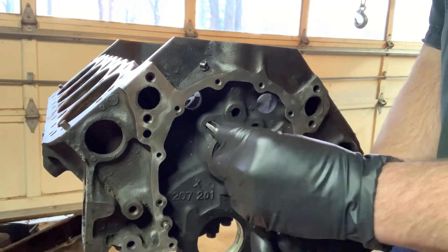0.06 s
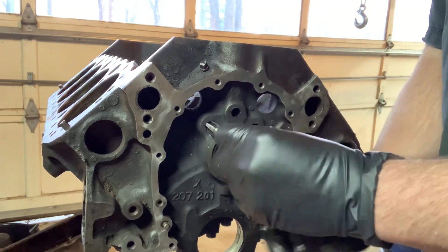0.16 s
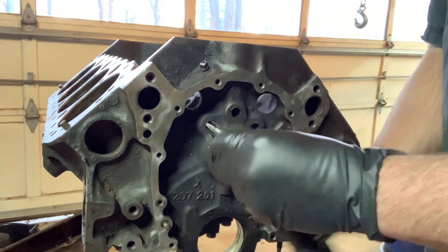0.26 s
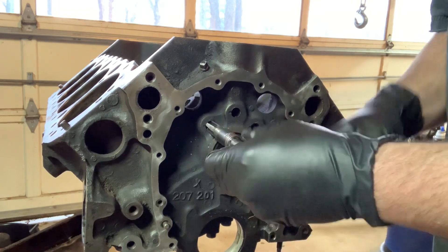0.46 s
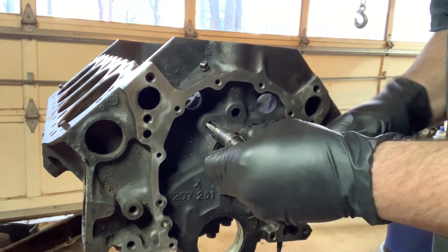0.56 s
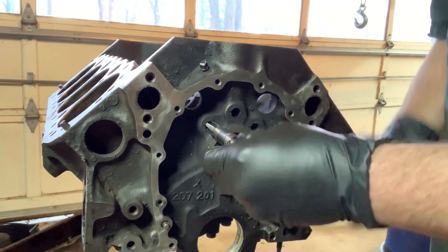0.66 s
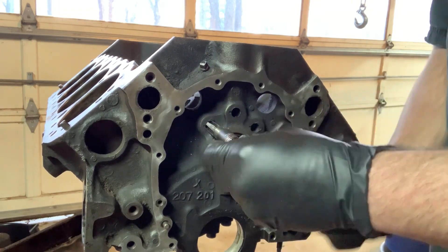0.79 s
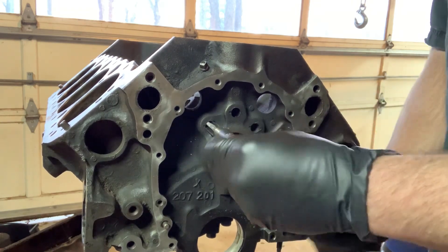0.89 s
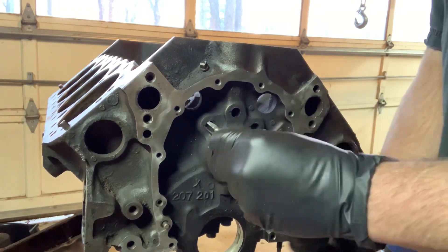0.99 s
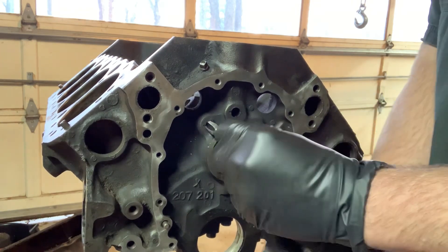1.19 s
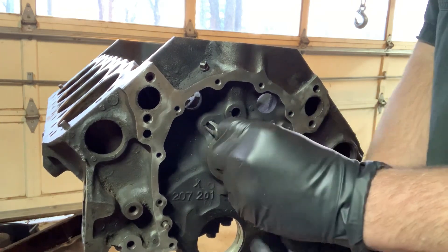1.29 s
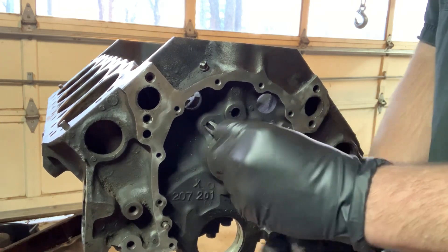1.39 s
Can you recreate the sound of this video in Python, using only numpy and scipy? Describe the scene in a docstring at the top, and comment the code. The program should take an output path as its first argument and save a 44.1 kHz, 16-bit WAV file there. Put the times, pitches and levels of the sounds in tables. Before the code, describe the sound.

A ratchet wrench clicks backward on a tap in an iron block. Faint glove rub and a tick open; from 0.23 to 0.5 s some sixteen bright, thin, ringing clicks run unevenly, strongest early, over fine steel sliding. Then quiet rustles and small ticks, soft knocks near 0.76 and 0.95, a fuller dull thud with rattle at 1.32, and a last tick at 1.42. Close, right-leaning, roomy, low rumble and hiss.

```python
"""A large workshop: a ratcheting handle is swung back on a pipe tap seated in a cast-iron engine block.
The pawl skips over a row of teeth: each drop rings the wrench's modes, a short clack and a noisy crack.
Sliding grains join the skips; damped thuds with a rattle, small ticks and glove rubbing come from handling.
Delay loops give the room's answer above a bed of rumble, hiss and hum made from shaped noise.
Two close microphones hear the tool slightly to one side: nearly all of it reaches the right one first."""
import sys
import numpy as np
from scipy import signal
from scipy.fft import rfft, irfft, next_fast_len
from scipy.io import wavfile

SR = 44100
rng = np.random.default_rng(int(sys.argv[2]) if len(sys.argv) > 2 else 0)


def level_to_linear(level):
    """Convert decibel levels to linear amplitude factors, elementwise."""
    exponent = np.asarray(level, float) / 20
    return 10 ** exponent


def unload_wav(signal):
    """Save mono or channel-first audio to the path in sys.argv[1] as 16-bit WAV at rate SR, clipped to [-1, 1]."""
    wavfile.write(
        sys.argv[1],
        SR,
        np.round(np.clip(np.atleast_2d(signal).T, -1, 1) * 32767).astype(np.int16),
    )


N = 63945  # length [samples]
NOW_S = np.arange(N) / SR
BIN_HZ = np.maximum(np.fft.rfftfreq(N, 1 / SR), 1)

# Pawl dropping behind each tooth, before mode levels and trims: (time [s], high ring [dB],
# low ring over high [dB], clack over high [dB], clack pitch [Hz])
TOOTH_DROPS = [(0.2294, -25.5, -7, -12.5, 2930), (0.2526, -24, -4.5, -12, 1640),
               (0.2732, -20, -12.5, -14, 1790), (0.2904, -19, -17.5, -13.5, 1607),
               (0.3052, -27.5, -5, -41.5, 2980), (0.3199, -25, -9.5, -12, 3116),
               (0.3355, -39, -17.5, 3.5, 3580), (0.3551, -22.5, -30.5, -10, 2700),
               (0.3747, -22, -9.5, -13, 2058), (0.3931, -28.5, -14, -8.5, 2680),
               (0.4039, -32.5, -6, -25, 3340), (0.4121, -22.5, -25, -16.5, 1960),
               (0.4297, -29.5, -5, 1, 2600), (0.4441, -43, -23, 4.5, 3710), (0.4578, -29, -3.5, -4.5, 1690),
               (0.4973, -30.5, -4.5, 1, 2187)]
# Vibration modes of the wrench, each part sounding from its own spot:
# (frequency [Hz], decay by 60 dB [s], lag of the left microphone [s])
WRENCH_MODES = [(4565, .05, 175e-6), (4608, .075, 165e-6), (9360, .02, 67e-6), (9466, .07, 67e-6),
                (9503, .06, 67e-6), (10300, .006, 60e-6), (10700, .007, 60e-6), (8500, .006, 67e-6),
                (11400, .006, 60e-6), (15300, .035, 45e-6), (15410, .03, 45e-6)]
# Strength of each of those modes, in the same order: (level over the ring [dB])
MODE_STRENGTHS = [-12, -5.5, -15.5, -7, -9.5, -18, -14, -31.5, -10.5, -19.5, -21]
# Relative spectrum of the broadband crack: (frequency [Hz], density [dB per Hz])
CRACK_SPECTRUM = [(530, -57.5), (900, -19.5), (4020, -14), (4650, -16), (6310, -12), (9540, -24),
                  (11900, -11.5), (15700, -25.5), (16500, -36.5)]
# Swell and fade of the pawl dragging up the teeth: (time [s], level [dB])
DRAG_SWELL = [(0.169, -92), (0.191, -66.5), (0.227, -57.5), (.3, -49.5), (.42, -51), (.48, -64),
              (0.521, -88.5), (0.559, -93)]
# Relative spectrum of the drag: (frequency [Hz], density [dB per Hz])
DRAG_SPECTRUM = [(150, -2.5), (300, -8), (900, -5.5), (2000, 4), (4000, 5), (7000, 4), (12000, -57),
                 (16500, -48)]
# Dull knocks of tool and hand: (time [s], thud level [dB], thud pitch [Hz], rattle over thud [dB])
DULL_KNOCKS = [(0.183, -53.5, 1023, 4), (0.415, -47.5, 1028, 3), (0.761, -62, 1010, 7),
               (0.95, -57.5, 1095, 3.5), (1.324, -40, 1196, -4)]
# Relative spectrum of the knocks' rattle: (frequency [Hz], density [dB per Hz])
RATTLE_SPECTRUM = [(71, -17.5), (120, -9), (537, -15), (1150, -7), (1560, -10), (3210, -19), (6500, -54),
                   (8080, -56), (9000, -65), (11700, -89), (19800, -120)]
# Dying away of the rattle by pitch: (frequency [Hz], decay by 60 dB [s])
RATTLE_DECAY = [(150, 0.22), (600, 0.28), (1500, 0.16), (4000, 0.16), (9000, 0.15)]
# Small ticks: (time [s], level before trim [dB], centre [Hz], width [octaves])
SMALL_TICKS = [(0.0302, -61, 2200, 0.9), (0.1382, -69.5, 1730, 0.65), (0.6002, -60.5, 4770, 1.0),
               (0.6752, -63, 4400, 0.63), (0.6907, -58.5, 1680, 0.48), (0.8535, -71.5, 1400, 0.93),
               (1.1122, -76, 1330, 0.66), (1.2472, -56.5, 4140, 1.0), (1.4234, -50, 2200, 0.89)]
# Glove rubbing on the tool, before trims: (time [s], dull rub [dB], bright rustle [dB], low rumble [dB])
GLOVE_RUB = [(0.0, -92, -76.5, -95), (0.02, -71.5, -68.5, -91), (0.05, -67.5, -71.5, -68),
             (0.124, -105, -101, -79), (0.17, -73, -94, -103), (0.62, -81, -70.5, -112),
             (0.636, -69, -89.5, -108), (0.7, -84, -71, -70.5), (0.726, -101, -100, -110),
             (0.766, -71, -67, -72.5), (0.81, -79, -77.5, -64.5), (0.844, -76.5, -101, -89.5),
             (0.854, -65, -78, -72), (0.914, -96, -100, -94), (0.964, -70, -71.5, -61),
             (1.022, -63, -92, -71.5), (1.146, -105, -87.5, -90.5), (1.246, -80.5, -73.5, -100.5),
             (1.27, -93.5, -85.5, -89), (1.298, -90, -101, -94.5), (1.326, -60.5, -65, -67),
             (1.408, -69.5, -70, -69), (1.45, -70.5, -65, -74.5)]
# Relative spectrum of the bright rustle: (frequency [Hz], density [dB per Hz])
RUSTLE_SPECTRUM = [(700, -27.5), (1500, 12.5), (3000, 7.5), (5500, -1.5), (7500, -32), (12000, -20),
                   (16000, -25.5)]
# Relative spectrum of the glove's low rumble: (frequency [Hz], density [dB per Hz])
RUMBLE_SPECTRUM = [(90, -20.5), (180, 4), (300, 3.5), (500, 0.5), (900, -51.5)]
# Relative spectrum of the background: (frequency [Hz], density [dB per Hz])
FLOOR_SPECTRUM = [(12, -27), (20, 4), (130, -5.5), (485, -22), (678, -28), (1120, -19), (1480, -24.5),
                  (4540, -34), (6910, -30), (8410, -59), (9670, -33), (12100, -33), (16000, -46.5)]
# Likeness of the background's two channels, held within -1 and 1: (frequency [Hz], left-right likeness)
FLOOR_ALIKE = [(60, 1), (120, 1), (240, 0.67), (480, 0.28), (950, -0.65), (1890, -1.2), (3770, 0.33),
               (7520, -0.14), (15000, 1)]
# Lean of the background to one side: (frequency [Hz], left minus right [dB])
FLOOR_LEAN = [(60, -8), (180, -6), (550, 2), (1650, -4), (4970, -1), (15000, 0.5)]
# Wavering hums, before that lean: (frequency [Hz], level [dB])
HUMS = [(109.3, -70.5), (66.5, -71.5)]

# Levels and trims are in dB; T60 is the time to fall by 60 dB; APART is the noise power share not common
# to left and right.
LEFT_LAG_S, CLACK_LAG_S = 6.7e-5, 0.00007
SPLIT_HZ = 6000  # modes below this form the low ring
LOW_LATE_S, STAGGER_S = .001, .0012  # the low ring starts late; modes catch at slightly different moments
CHATTER_DB, CHATTER_T60_S = -23.5, 0.042
HIGH_CHATTER_APART, LOW_CHATTER_APART = 0.11, .8
BOUNCE_S, BOUNCE_DB = .0013, -6  # mean gap and drop in level per rebound of the pawl
CLACK_DB, CLACK_T60_S = -4.5, .009
CRACK_DB, CRACK_T60_S, CRACK_APART = -0.5, .012, 0.43
CRACK_FOLLOWS = 0.83  # share of the clack's dB that the crack takes on
CRACK_RISE_S = .0005  # time constant
THIN_HZ = 1190  # the clicks have no body below this
DRAG_PER_S = 3800  # mean grain rate
KNOCK_T60_S = .014
BLOCK_HZ, BLOCK_DB, BLOCK_T60_S = 630, -13, .07  # level over the thud
RATTLE_RISE_S, RATTLE_APART = 0.0016, 0.85  # rise is a time constant
TICK_DB, TICK_FUZZ_DB, TICK_T60_S = 3, -13.5, 0.025
RUB_HZ, RUB_WIDTH_HZ, RUB_DB, RUMBLE_DB = 791, 68, -4, -6
ROOM_T60_S, WALL_CUT_HZ = 0.3, 6400  # decay of the bass; lowpass on every round
ROOM_DB, KNOCK_ROOM_DB = -15.5, -13  # sends from the tool and from the hand
FLOOR_DB, HUM_WIDTH_HZ = -70, 8.1  # bed level before its lean; width of each hum 6 dB down
BASS_CUT_HZ, CUTOFF_HZ = 57, 16900


def rms_one(x):
    """Scale to rms 1."""
    return x / np.sqrt(np.mean(x ** 2) + 1e-20)


def at_hz(points, hz):
    """Read a table on a log-frequency axis."""
    table_hz, value = np.array(points).T
    return np.interp(np.log(hz), np.log(table_hz), value)


def coloured(x, spectrum):
    """Give x a spectrum."""
    return irfft(rfft(x) * level_to_linear(at_hz(spectrum, BIN_HZ)), N)


def filtered(x, order, hz, kind):
    """Butterworth filter."""
    return signal.sosfilt(signal.butter(order, hz, kind, fs=SR, output="sos"), x)


def clicks(s, gain):
    """Impulses at the times s."""
    out = np.zeros(N)
    place = np.clip((np.asarray(s) * SR).astype(int), 0, N - 1)
    np.add.at(out, place, gain)
    return out


def ring(x, hz, t60):
    """Damped resonance: a unit click sets a sine of height 1 ringing."""
    r = level_to_linear(-60 / (t60 * SR))
    w = 2 * np.pi * hz / SR
    return signal.lfilter([0, np.sin(w)], [1, -2 * r * np.cos(w), r * r], x + 1e-18)


def dying(s, gain, t60):
    """Envelope that jumps at the times s and decays exponentially."""
    return signal.lfilter([1], [1, -level_to_linear(-60 / (t60 * SR))], clicks(s, gain) + 1e-18)


def arriving(x, lag=LEFT_LAG_S):
    """Sound from one side: the right microphone hears x first, the left one lag seconds later."""
    delay = np.exp(-2j * np.pi * np.fft.rfftfreq(N, 1 / SR) * lag)
    return np.array([irfft(rfft(x) * delay, N), x])


def pair_noise(apart, lag=LEFT_LAG_S):
    """Stereo noise, partly shared by both microphones."""
    shared, left, right = rng.standard_normal((3, N))
    return np.sqrt(1 - apart) * arriving(shared, lag) + np.sqrt(apart) * np.array([left, right])


def wrench_ring(s, db, low_db):
    """Each drop strikes the steel's modes, and loose play after it keeps striking them as fading noise."""
    out = 0
    for (hz, t60, lag), mode_db in zip(WRENCH_MODES, MODE_STRENGTHS):
        low = hz < SPLIT_HZ
        start = s + low * LOW_LATE_S + STAGGER_S * rng.random(len(s))
        level = db + low * low_db + mode_db
        spread_db = rng.normal(0, 1.5, len(s))
        strike = clicks(start, level_to_linear(level + spread_db) * rng.choice([-1, 1]))
        play = pair_noise(LOW_CHATTER_APART if low else HIGH_CHATTER_APART, lag)
        chatter = play * dying(start, level_to_linear(level + CHATTER_DB), CHATTER_T60_S)
        out = out + ring(arriving(strike, lag) + chatter, hz, t60)
    return out


def pawl_clack(when, level_db, pitch_hz, bounce_db):
    """The drop and its rebounds excite three short, inharmonic resonances."""
    out = 0
    for row, level, hz in zip(when, level_db, pitch_hz):
        hit = clicks(row, level_to_linear(level + bounce_db))
        out = out + ring(hit, hz, CLACK_T60_S)
        out = out - 0.98 * ring(hit, 1.6 * hz, CLACK_T60_S)
        out = out + .3 * ring(hit, 2.1 * hz, CLACK_T60_S)
    return arriving(out, CLACK_LAG_S)


def pawl_crack(s, when, level_db, bounce_db):
    """Broadband noise bursts at the drop and its rebounds, softened at each drop's onset."""
    envelope = dying(when.ravel(), level_to_linear(level_db[:, None] + bounce_db).ravel(), CRACK_T60_S)
    noise = rms_one(coloured(pair_noise(CRACK_APART), CRACK_SPECTRUM))
    # a brief dip, recovering with the rise time constant, blunts the attack
    dip = np.minimum(dying(s, 0.79, np.log(1000) * CRACK_RISE_S), 1)
    return noise * envelope * (1 - dip)


def ratchet():
    """The pawl drops behind each tooth and rebounds twice, sounding ring, clack and crack together."""
    s, db, low_db, clack_db, clack_hz = np.transpose(TOOTH_DROPS)
    hops = np.arange(3)  # the drop and two rebounds
    when = s[:, None] + BOUNCE_S * hops * rng.uniform(.7, 1.3, (len(s), 3))
    bounce_db = BOUNCE_DB * hops
    wrench = wrench_ring(s, db, low_db)
    clack = pawl_clack(when, db + clack_db + CLACK_DB, clack_hz, bounce_db)
    crack = pawl_crack(s, when, db + CRACK_DB + CRACK_FOLLOWS * clack_db, bounce_db)
    return filtered(wrench + clack + crack, 4, THIN_HZ, "high")


def drag():
    """Dense uneven grains of steel sliding on steel."""
    present = rng.random(N) < DRAG_PER_S / SR
    size = level_to_linear(1.4 * np.minimum(rng.exponential(1, N), 4))
    grains = present * size * rng.choice([-1, 1], N)
    swell = level_to_linear(np.interp(NOW_S, *np.transpose(DRAG_SWELL)))
    return rms_one(coloured(grains, DRAG_SPECTRUM)) * swell


def knocks():
    """A short damped thud with the block's resonance, and a rattle whose octaves die at their own rates."""
    s, db, thud_hz, rattle_db = np.transpose(DULL_KNOCKS)
    thuds = ring(clicks(s, level_to_linear(db + BLOCK_DB)), BLOCK_HZ, BLOCK_T60_S)
    for time, level, hz in zip(s, db, thud_hz):
        thuds = thuds + ring(clicks([time], level_to_linear(level)), hz, KNOCK_T60_S)
    noise = rms_one(coloured(pair_noise(RATTLE_APART), RATTLE_SPECTRUM))
    rise = np.exp(-1 / (RATTLE_RISE_S * SR))
    rattle = 0
    for hz in 160 * 2. ** np.arange(6):  # lower edge of each octave
        band = filtered(noise, 2, [hz, 2 * hz], "band")
        decay = dying(s, level_to_linear(db + rattle_db), at_hz(RATTLE_DECAY, 1.4 * hz))
        rattle = rattle + band * signal.lfilter([1 - rise], [1, -rise], decay)
    return arriving(filtered(thuds, 2, 3000, "low")) + rattle


def ticks():
    """A light double touch and its fading fuzz, each tick in a band of its own."""
    noise = pair_noise(0.13)
    out = 0
    for s, db, hz, octaves in SMALL_TICKS:
        edges = hz * 2 ** (np.array([-.5, .5]) * octaves)
        fuzz = noise * dying([s], level_to_linear(TICK_FUZZ_DB), TICK_T60_S)
        touch = arriving(clicks([s, s + 0.0053], level_to_linear([0, -3]))) + fuzz
        # a narrow band passes less of a click, so it is raised to match
        width_gain = SR / 4 / (edges[1] - edges[0])
        out = out + filtered(touch, 2, edges, "band") * level_to_linear(db + TICK_DB) * width_gain
    return out


def rubbing():
    """The moving glove as three noises: a dull resonance, a bright rustle and a low rumble."""
    s, dull_db, bright_db, low_db = np.transpose(GLOVE_RUB)
    dull = level_to_linear(np.interp(NOW_S, s, dull_db + RUB_DB))
    bright = level_to_linear(np.interp(NOW_S, s, bright_db))
    low = level_to_linear(np.interp(NOW_S, s, low_db + RUMBLE_DB))
    tone = rms_one(ring(pair_noise(0.63), RUB_HZ, np.log(1000) / np.pi / RUB_WIDTH_HZ))
    rustle = rms_one(coloured(pair_noise(.8), RUSTLE_SPECTRUM))
    rumble = rms_one(coloured(pair_noise(.5), RUMBLE_SPECTRUM))
    return dull * tone + bright * rustle + low * rumble


def workshop(x):
    """Room echo: ten feedback delays a side, duller on every round, then spread by allpasses."""
    size = next_fast_len(N + SR)
    z = np.exp(-2j * np.pi * np.arange(size // 2 + 1) / size)  # delay of one sample
    dull = np.exp(-2 * np.pi * WALL_CUT_HZ / SR)
    lowpass = (1 - dull) / (1 - dull * z)
    out = []
    for lags in rng.uniform(.008, .045, (2, 10)) * SR // 1:
        response = 0
        for k, lag in enumerate(lags):
            loop = level_to_linear(-60 * lag / SR / ROOM_T60_S) * lowpass * z ** lag
            response = response + (-1) ** k * loop / (1 - loop)
        for lag in (53, 131, 241):  # allpass delays [samples]
            response = response * (z ** lag - .6) / (1 - .6 * z ** lag)
        out.append(irfft(rfft(x, size) * response, size)[:N])
    return np.array(out)


def floor():
    """Rumble and hiss with narrow noise hums, alike or opposed in the two channels by frequency."""
    alike = np.clip(at_hz(FLOOR_ALIKE, BIN_HZ), -1, 1)
    tilt = level_to_linear(at_hz(FLOOR_LEAN, BIN_HZ) / 2)
    hum = 0
    for centre_hz, db in HUMS:
        hum = hum + level_to_linear(db) ** 2 / (1 + (2 * (BIN_HZ - centre_hz) / HUM_WIDTH_HZ) ** 2) ** 2
    hum_power = hum * SR / (np.pi / 2 * HUM_WIDTH_HZ) / 2
    bed = level_to_linear(at_hz(FLOOR_SPECTRUM, BIN_HZ)) ** 2
    bed_power = bed / bed.mean() * level_to_linear(FLOOR_DB) ** 2
    noise = rfft(rng.standard_normal((2, N))) * np.sqrt(bed_power + hum_power)
    mid, side = noise * [np.sqrt(1 + alike), np.sqrt(1 - alike)]
    return irfft([(mid + side) * tilt, (mid - side) / tilt], N) / np.sqrt(2)


def scene():
    """Tool and hand, glove, the room's answer and the floor."""
    tool = ratchet() + arriving(drag())
    hand = knocks() + ticks()
    to_room = level_to_linear(ROOM_DB) * tool[1] + level_to_linear(KNOCK_ROOM_DB) * hand[1]
    return tool + hand + rubbing() + workshop(to_room) + floor()


def roll_off(x):
    """The treble ends steeply here."""
    return signal.sosfilt(signal.butter(12, 16810, fs=SR, output="sos"), x)


def record(dry):
    """Filters cut the deep bass and the extreme top of the mix."""
    mix = filtered(dry, 2, BASS_CUT_HZ, "high")
    mix = signal.sosfilt(signal.cheby2(12, 60, CUTOFF_HZ, fs=SR, output="sos"), mix)
    return roll_off(mix)


dry = scene()
out = record(dry)
unload_wav(out)
```